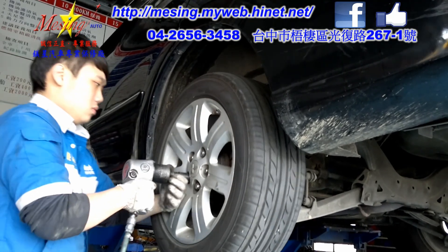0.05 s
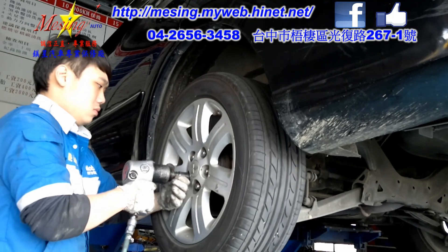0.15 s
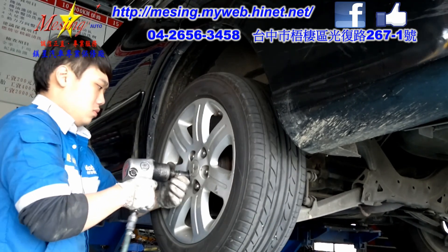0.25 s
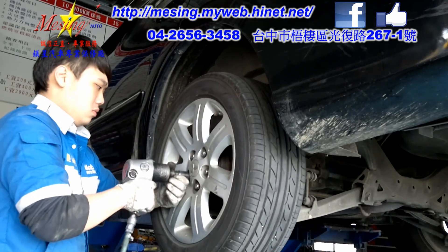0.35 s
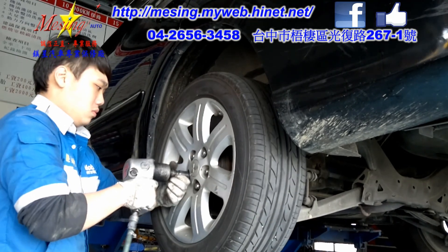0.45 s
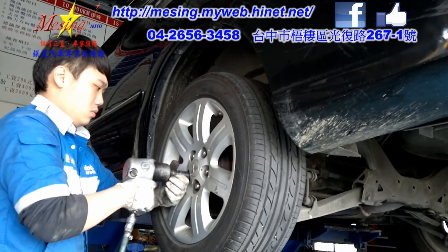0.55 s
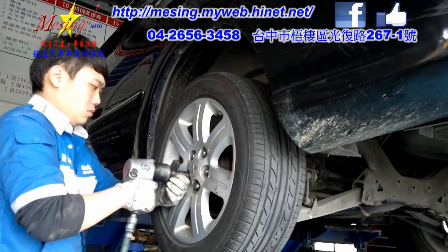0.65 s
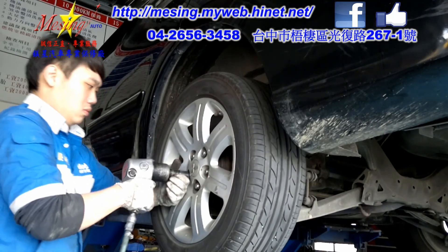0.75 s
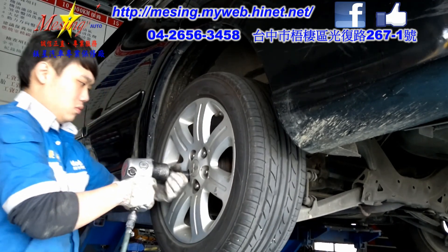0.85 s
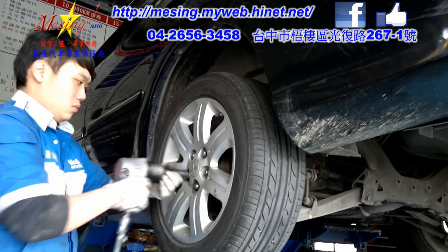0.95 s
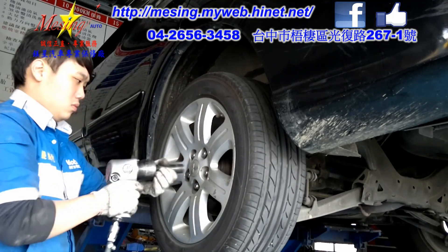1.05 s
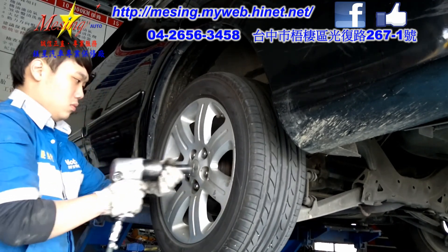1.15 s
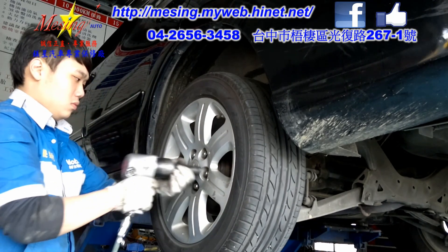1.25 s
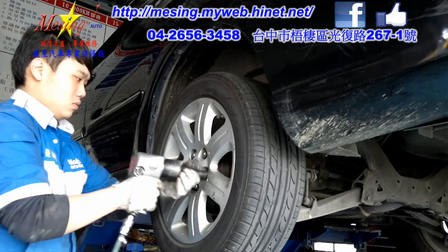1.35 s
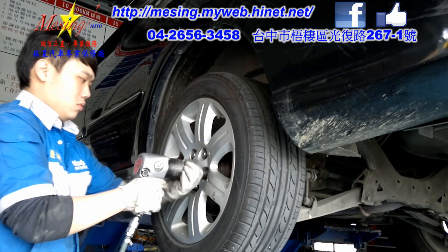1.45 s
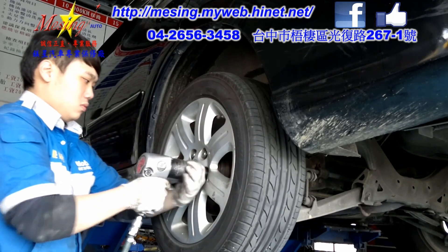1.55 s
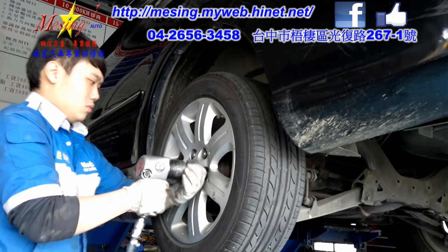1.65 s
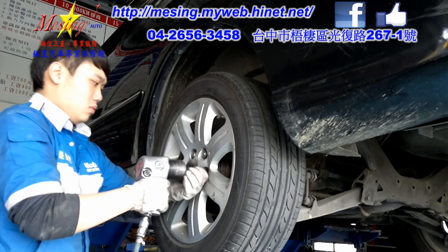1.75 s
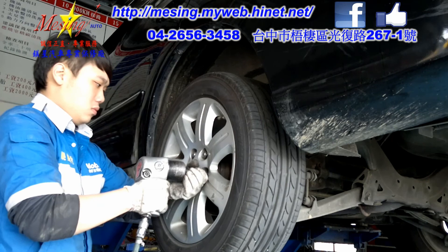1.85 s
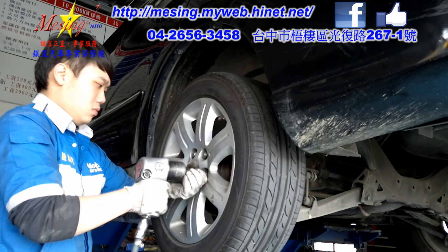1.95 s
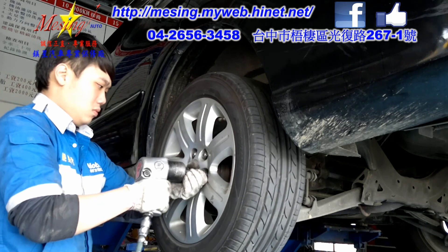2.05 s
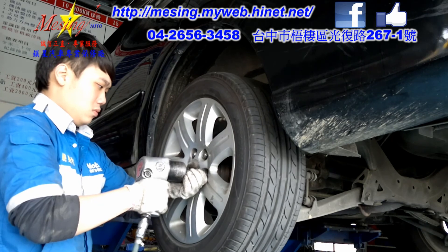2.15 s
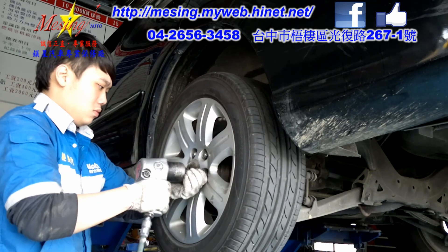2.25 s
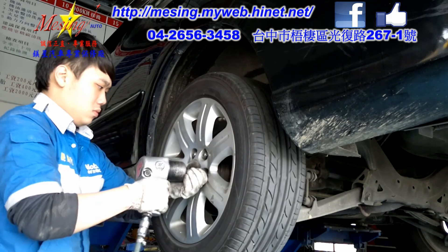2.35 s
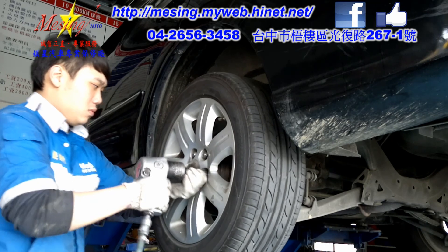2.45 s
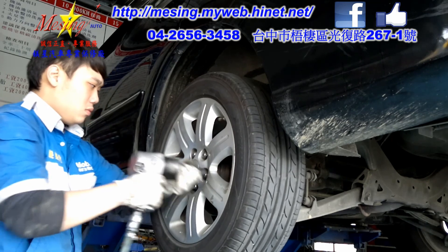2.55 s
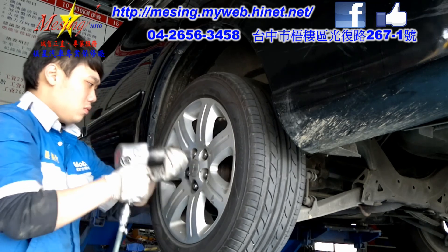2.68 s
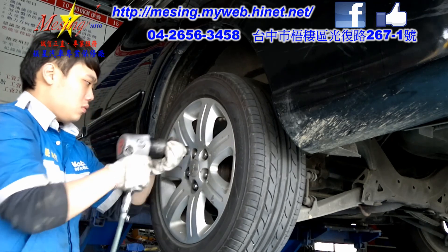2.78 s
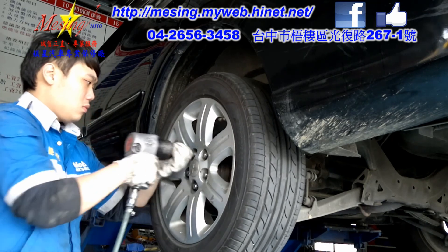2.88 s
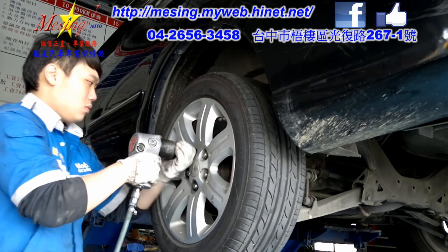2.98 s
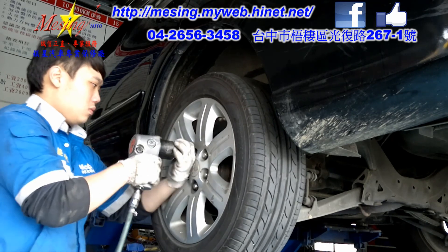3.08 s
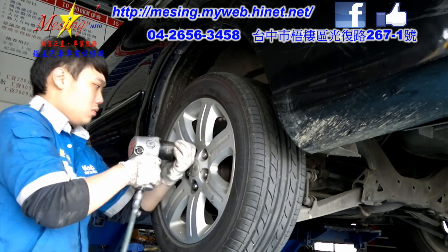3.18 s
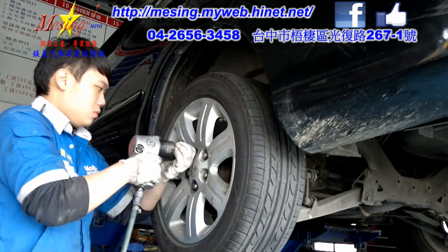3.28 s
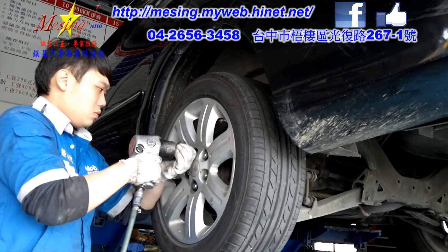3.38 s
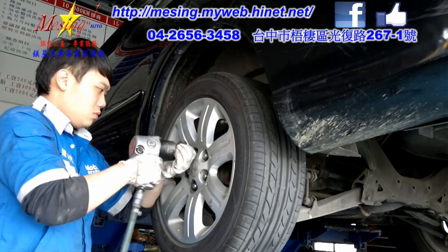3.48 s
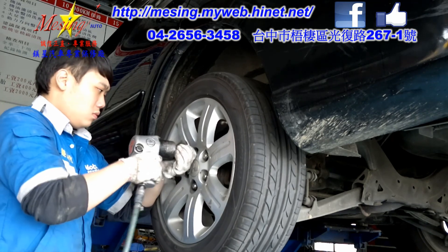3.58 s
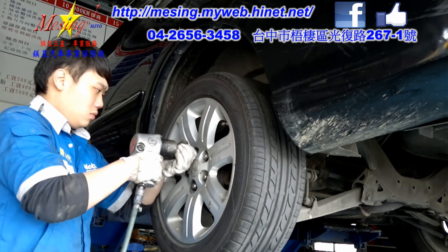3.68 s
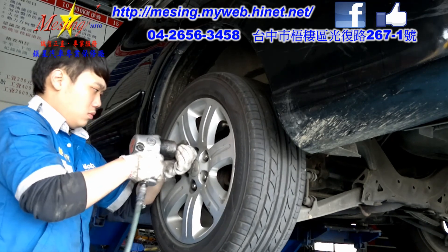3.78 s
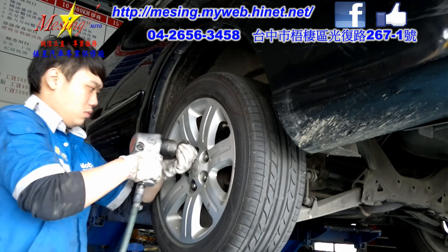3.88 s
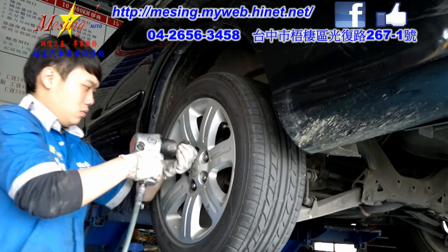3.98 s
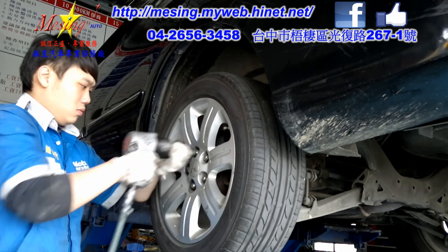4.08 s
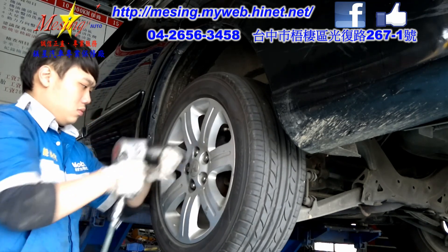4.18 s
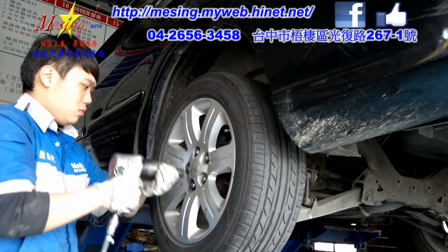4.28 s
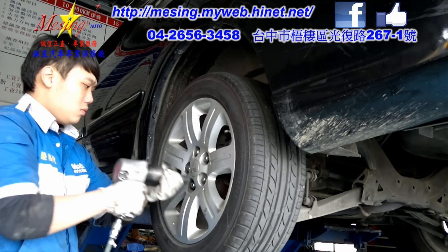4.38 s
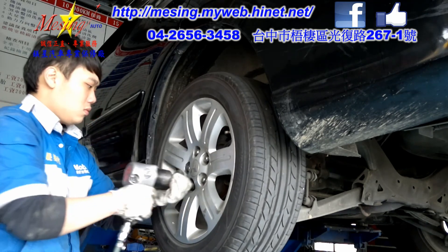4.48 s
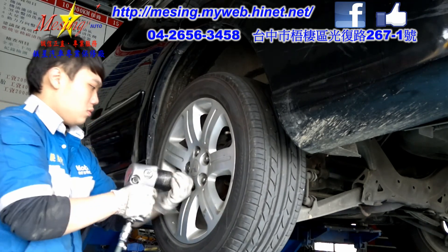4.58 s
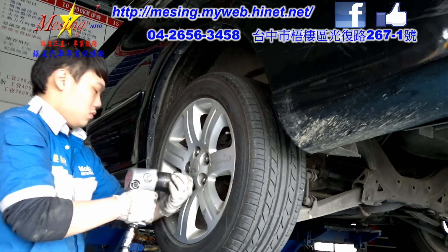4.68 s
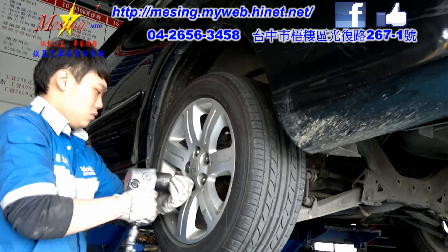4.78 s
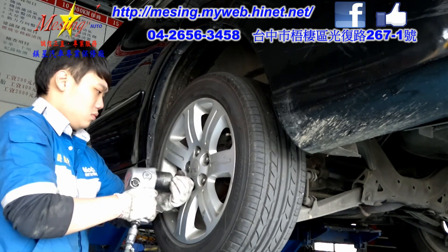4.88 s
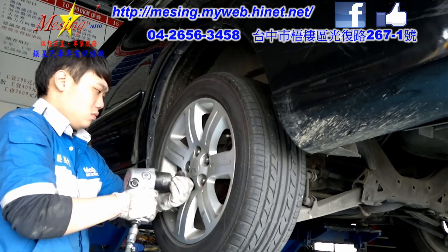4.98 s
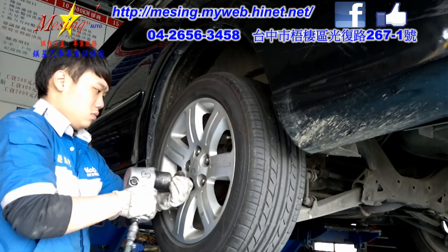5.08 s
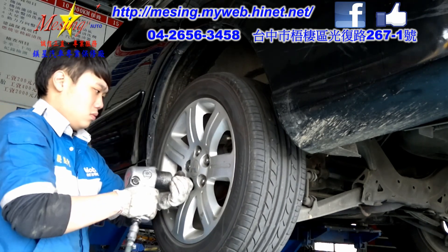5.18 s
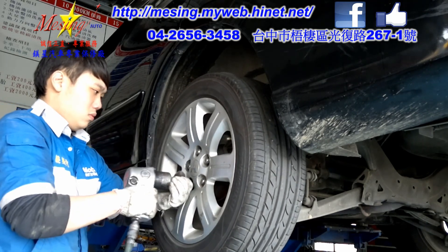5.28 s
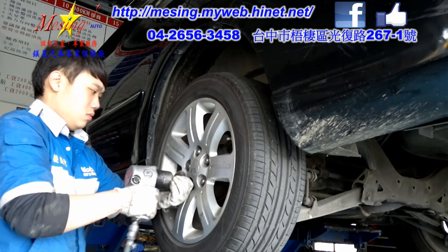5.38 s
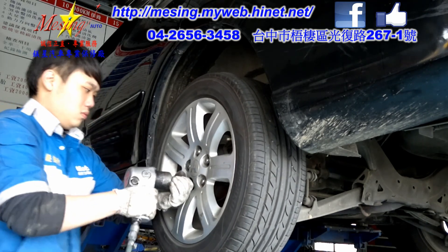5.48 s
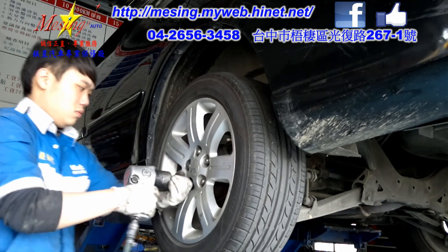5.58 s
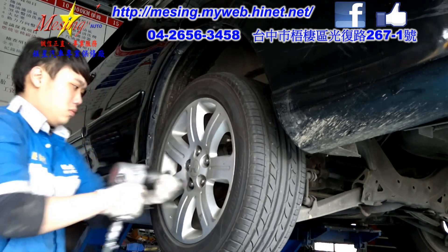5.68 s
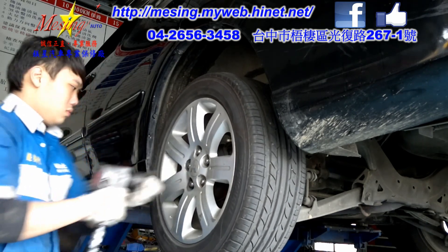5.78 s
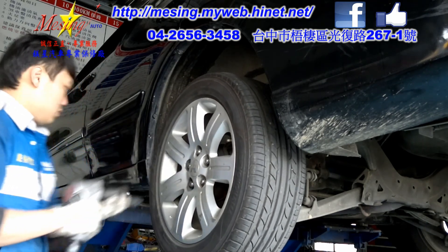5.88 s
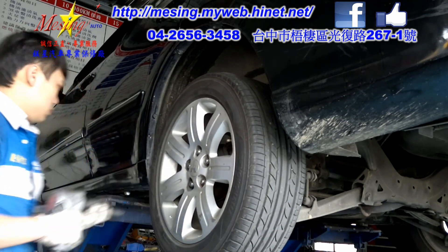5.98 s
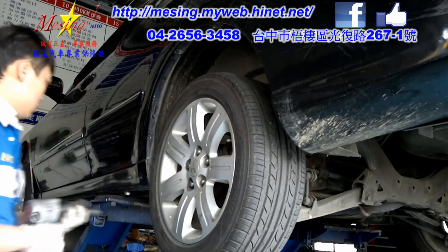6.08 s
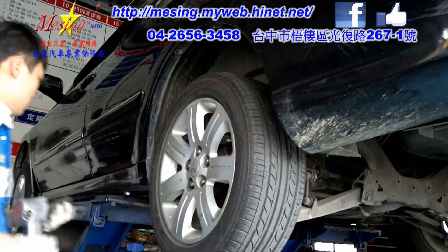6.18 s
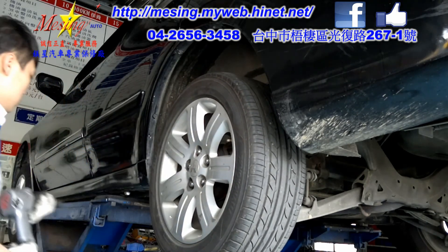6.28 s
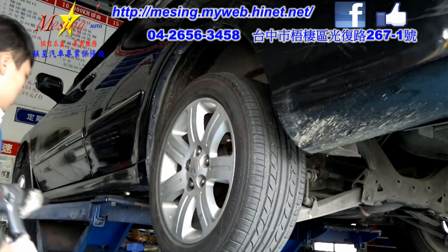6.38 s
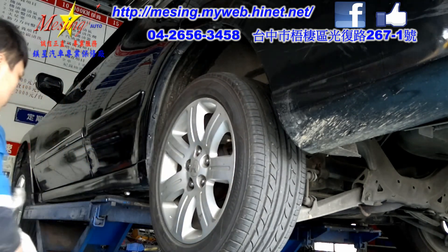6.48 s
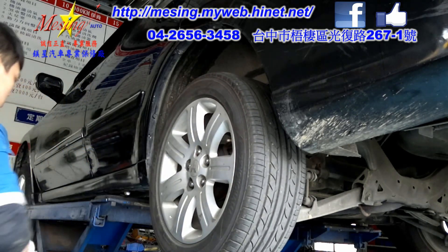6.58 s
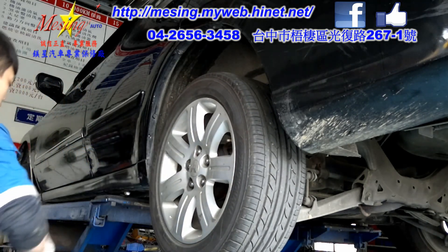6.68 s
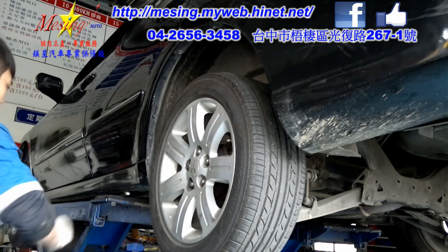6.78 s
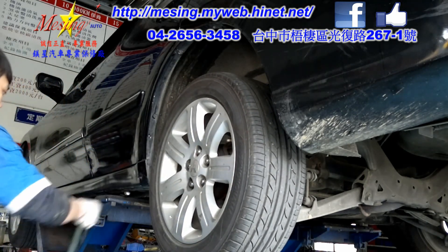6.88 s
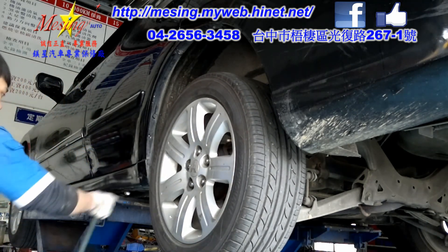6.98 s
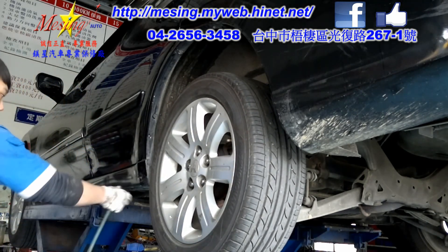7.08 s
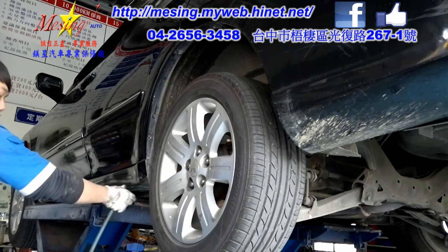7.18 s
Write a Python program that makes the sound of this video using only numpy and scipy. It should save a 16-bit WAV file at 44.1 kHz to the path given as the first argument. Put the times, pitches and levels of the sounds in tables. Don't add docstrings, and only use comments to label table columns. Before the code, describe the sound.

Four groups of four rattling pneumatic bursts, hissing and hammering at about twenty turns a second, with steel pings and low tyre thumps. Metallic clicks as the socket finds the next nut. Stereo microphone nearby in a hard workshop, with draught rumbling on it. The end is quieter: faint leaking air, a rolling lift, one sharp tool knock and a scraping hose.

```python
import sys
import numpy as np
from scipy import signal
from scipy.fft import rfft, irfft, next_fast_len
from scipy.io import wavfile
from scipy.ndimage import uniform_filter1d, map_coordinates

SR = 44100
rng = np.random.default_rng(int(sys.argv[2]) if len(sys.argv) > 2 else 0)


def magnitude_from_level(level_db):
    exponent = np.asarray(level_db, float) / 20
    return 10 ** exponent


def inscribe(sig):
    pcm = np.round(np.clip(np.atleast_2d(sig).T, -1, 1) * 32767)
    wavfile.write(sys.argv[1], SR, pcm.astype(np.int16))


N = 319284

# (time [s], held [s], air level [dB], hammer turn [s], roar over jet [dB])
TRIGGER_PULLS = [(0.008, .315, -22.5, .0418, 2.5), (0.417, 0.096, -22.5, .045, 0.5),
                 (0.607, 0.12, -25, 0.044, 3.5), (0.772, 0.125, -24, .048, 5), (1.733, 0.23, -22, 0.047, 6),
                 (2.045, 0.11, -23, 0.054, 4.5), (2.229, 0.1, -24.5, 0.053, 3.5),
                 (2.392, 0.14, -23, 0.057, 3), (3.234, 0.25, -22, 0.041, 5), (3.592, 0.12, -23, 0.051, 4.5),
                 (3.772, 0.087, -24, .0415, 5), (3.948, 0.11, -22.5, 0.037, -0.5),
                 (4.806, 0.26, -22, .043, 2), (5.14, 0.096, -23, .043, 7), (5.305, 0.12, -25, 0.038, 4),
                 (5.503, 0.094, -23, 0.047, 3)]
# (frequency [Hz], level [dB per Hz])
SOCKET_RATTLE = [(590, -31), (1000, -4), (1240, -9.5), (1340, -4.5), (1570, -5.5), (1680, -6), (1800, -3.5),
                 (2470, -4), (2910, -1), (3210, -5), (3580, -3.5), (4890, -8.5), (5200, -13.5), (6760, -25),
                 (11400, -120)]


def unit(x):
    return x / np.sqrt(np.mean(x ** 2) + 1e-20)


def along(points, hz):
    f, v = np.transpose(points)
    return np.interp(np.log(hz + 1), np.log(f + 1), v)


def curves(rows, **ends):
    s, *columns = np.transpose(rows)
    t = np.arange(N) / SR
    return np.array([np.interp(t, s, column, **ends) for column in columns])


def wobble(rate):
    knots = rng.standard_normal(int(N * rate / SR) + 4)
    return map_coordinates(knots, [np.arange(N) * rate / SR])


def filtered(x, response):
    m = next_fast_len(N + SR // 2)
    return irfft(rfft(x, m) * response(np.fft.rfftfreq(m, 1 / SR)), m)[..., :N]


def noise(spectrum):
    return unit(filtered(rng.standard_normal(N), lambda hz: magnitude_from_level(along(spectrum, hz))))


def shaped(events, shape):
    spikes = np.bincount(np.round(events[:, 0] * SR).astype(int), magnitude_from_level(events[:, 1]), N)
    return signal.fftconvolve(spikes, shape)[:N]


def spread(pair):
    # (frequency [Hz], left-right likeness [-1 to 1])
    port_likeness = [(60, 0.95), (170, 0.87), (480, 1), (1360, 0.098), (3850, -0.051), (10900, -0.2)]

    def turn(hz):
        return np.arccos(np.clip(along(port_likeness, hz), -1, 1)) / 2

    mid, side = filtered(pair, lambda hz: np.array([np.cos(turn(hz)), np.sin(turn(hz))]))
    return np.array([mid + side, mid - side])


def draught():
    # (time [s], level [dB])
    steady_buffet = [
        (0, -26),
        (.45, -24),
        (1, -37),
        (2.5, -39.5),
        (4.3, -42.5),
        (5.1, -39.5),
        (5.85, -49),
        (6.4, -35.5),
        (7.24, -33),
    ]
    # (time [s], peak level [dB])
    air_gusts = [(.12, -21), (.22, -25), (.54, -24), (.83, -42), (1.11, -39), (1.195, -30), (1.41, -31),
                 (1.571, -30), (1.725, -19), (1.86, -39), (2.399, -48), (2.68, -48), (2.94, -38.5),
                 (3.1, -28), (3.178, -27), (4.01, -43), (4.655, -27), (4.759, -35), (6.469, -35.5),
                 (6.56, -33), (6.72, -38.5), (7.02, -28), (7.2, -24)]
    # (frequency [Hz], level [dB per Hz])
    buffet_spectrum = [(8.8, -33), (15, -2.5), (49, 3), (139, -3), (221, -11.5), (271, -13.5), (320, -16.5),
                       (420, -25), (700, -120)]
    rise_s, fall_s, right_db = 0.024, 0.031, 5
    lumps = magnitude_from_level(1.5 * np.array([wobble(20), wobble(24)]))
    s, db = np.transpose(air_gusts)[..., None]
    u = np.arange(N) / SR - s
    gusts = np.sum(magnitude_from_level(db) * np.exp(-(u / np.where(u < 0, rise_s, fall_s)) ** 2), axis=0)
    pressure = unit(lumps * [noise(buffet_spectrum), noise(buffet_spectrum)])
    return (magnitude_from_level(curves(steady_buffet)) + gusts) * magnitude_from_level([[-right_db], [right_db]]) * pressure


def shop():
    # (time [s], lift roll level [dB], hose drag level [dB])
    lift_and_hose = [
        (6.32, -52, -57),
        (6.375, -29.5, -48),
        (6.46, -37.5, -44.5),
        (6.61, -34.5, -40),
        (6.682, -27.5, -24.5),
        (6.694, -22.5, -23),
        (6.85, -27.5, -28.5),
        (7.02, -29.5, -35),
        (7.14, -26, -30.5),
    ]
    # (time [s], leak level [dB])
    gain_recovery = [
        (0, -61),
        (1.3, -49.5),
        (2.9, -48),
        (4.4, -46),
        (5.8, -51),
        (6, -44),
        (7.24, -35),
    ]
    # (frequency [Hz], level [dB per Hz])
    lift_roll = [(88, -47), (150, -7), (334, -8.5), (416, -6.5), (752, -3.5), (960, -10), (1560, -10),
                 (2400, -39), (3120, -68), (5280, -120)]
    hose_drag = [(880, -30), (1500, -5.5), (2160, 0.5), (2590, -7.5), (3860, -5), (5010, -11),
                 (5940, -11.5), (10500, -35.5), (13600, -59), (22000, -120)]
    air_leak = [(150, -45), (250, -16), (270, -2.5), (301, -21), (331, -7.5), (554, -7), (818, -7.5),
                (884, -13), (2290, -18), (3660, -11.5), (4920, -21), (5930, -25), (10400, -44),
                (13500, -63), (22000, -120)]

    def pair(spectrum):
        return np.array([noise(spectrum), noise(spectrum)])

    roll, drag = magnitude_from_level(curves(lift_and_hose, left=-120) + 1.1 * wobble(25))
    leak = magnitude_from_level(curves(gain_recovery))
    return spread(roll * pair(lift_roll) + drag * pair(hose_drag) + leak * pair(air_leak))


def hall(x):
    # (frequency [Hz], t60 [s])
    hall_decay = [(200, 0.43), (700, 0.65), (3000, 0.7), (6000, 0.61), (10000, 0.33)]
    wet = 0
    phase = np.arange(N) / SR / 0.3493
    for k in range(2):
        hz, t, z = signal.stft(rng.standard_normal((2, 3 * SR // 4)), SR, nperseg=256)
        decay = magnitude_from_level(-60 * t / along(hall_decay, hz)[:, None])
        tail = signal.istft(z * decay, SR, nperseg=256)[1]
        part = x * np.cos(np.pi * (phase - k) / 2) ** 2
        delayed = np.pad(part, (300, 0))[None]
        wet = wet + signal.fftconvolve(delayed, tail / np.linalg.norm(tail[0]), axes=1)[:, :N]
    return spread(wet)


def nearby(x):
    shift_s, shaded_hz = 0.09, 4300
    t, count = np.arange(SR // 12) / SR, 6
    paths = rng.standard_normal((count, 2, len(t))) * magnitude_from_level(-60 * t / 0.025)
    scatter = np.diff(paths, prepend=0)
    away = (np.arange(N) / SR / shift_s - np.arange(count)[:, None]) % count - 1
    parts = x * np.cos(np.pi / 2 * np.clip(away, -1, 1))
    scattered = signal.fftconvolve(parts[:, None], scatter / np.linalg.norm(scatter[0, 0]), axes=2)
    direct = filtered(x, lambda hz: 1 / (1 + 1j * hz / shaded_hz))
    return direct + magnitude_from_level(4.5) * scattered.sum(0)[:, :N]


def body(f):
    # (frequency [Hz], width [Hz], level [dB])
    body_modes = [(266.5, 80, -1), (374, 76, -1.5), (463, 133, -3), (655.5, 80, 1.5), (836, 80, -4),
                  (946, 145, -6), (1243, 125, -7)]
    return sum((-1) ** k * magnitude_from_level(db) * 1j * f * width / (centre * centre - f * f + 1j * f * width)
               for k, (centre, width, db) in enumerate(body_modes))


def strikes(events, modes, knock_db):
    # (frequency [Hz], level [dB per Hz])
    contact_noise = [(240, -51), (400, -8), (677, -1), (930, -10), (3510, -8), (8150, -35), (10300, -57),
                     (10900, -45), (14200, -71), (22000, -120)]
    out, scrape, push = np.zeros(N + SR), np.zeros(N + SR), np.zeros(N)
    t = np.arange(SR // 5) / SR
    contact = 1 - np.exp(-t / 0.00044)
    for s, db, ring_db, thud_db, scrape_s in events:
        start = round(s * SR)
        luck = rng.standard_normal((len(modes), 2))
        ring = sum(magnitude_from_level(level + 1.9 * a - 60 * t / t60) * np.sin(2 * np.pi * hz * (1 + 0.027 * b) * t)
                   for (hz, level, t60), (a, b) in zip(modes, luck))
        out[start:][:len(t)] += magnitude_from_level(db + ring_db) * ring * contact
        scrape[start:][:len(t)] += magnitude_from_level(db - 60 * t / max(scrape_s, 0.003))
        push[start] = magnitude_from_level(db + thud_db + knock_db)
    return out[:N] + magnitude_from_level(-7.0) * scrape[:N] * noise(contact_noise) + filtered(push, body)


def clicks():
    # (time [s], peak level [dB], ring level [dB], knock level [dB], scrape t60 [s])
    metal_touches = [(1.3907, -17, -11.5, -8.5, 0.16), (1.4616, -27, -18, -10, 0.1),
                     (1.5923, -29, 2, -12, 0.05), (1.6076, -16, -5.5, 6.5, 0.19),
                     (2.6794, -28, -13, -5, 0.1), (2.9804, -24, 1.5, -20, 0.24),
                     (3.1313, -25, -13, -15, 0.26), (4.5441, -23.5, -7, -9, 0.13),
                     (4.563, -21.5, -6, -8.5, 0.19), (4.6648, -29.5, -14, -6, 0.12),
                     (6.6885, -7, -10.5, -19, 0.04)]
    # (frequency [Hz], level [dB], t60 [s])
    socket_modes = [(1220, -3, 0.03), (2300, -6, 0.043), (2944, 3, 0.03), (3700, -3, 0.025),
                    (4440, -4, 0.03), (6170, -13, 0.036)]
    return strikes(metal_touches, socket_modes, knock_db=32.5)


def airflow():
    opening, sagging, closing = (899, 1300), (11, 13.5), (188, 257.5)  # (jet, roar) [dB per s]
    rates = np.array([opening, sagging, closing])
    t = np.arange(N) / SR
    gains = 0
    for s, held, db, _, roar_db in TRIGGER_PULLS:
        u = t - s
        ramps = np.array([np.maximum(-u, 0), np.clip(u, 0, held), np.maximum(u - held, 0)])
        gains = gains + magnitude_from_level(db + np.array([[0], [roar_db]]) - rates.T @ ramps)
    return gains


def turns():
    loss_db, jitter_s = 0.6, 0.0012
    s, held, db, turn, _ = np.transpose(TRIGGER_PULLS)[..., None]
    k = np.arange(10) + 0 * s
    luck = rng.standard_normal(k.shape + (4,))
    on = k * turn < held
    moments = s + k * turn + jitter_s * luck[..., 0] * (k > 0)
    return moments[on], (db - loss_db * k)[on], (k == 0)[on], luck[on][:, 1:].T


def chatter():
    ticks_per_s, scatter_db = 170, 3
    slots = np.arange(int(N / SR * ticks_per_s))
    luck = rng.random((len(slots), 2))
    ticks = np.zeros(N)
    moments = ((slots + luck[:, 0]) / ticks_per_s * SR).astype(int)
    ticks[moments] = magnitude_from_level(-scatter_db * np.log(luck[:, 1]))
    return magnitude_from_level(-9) * airflow()[0] * unit(filtered(ticks, lambda hz: magnitude_from_level(along(SOCKET_RATTLE, hz))))


def thump(turning):
    thump_hz, lag_s, width_s = 275, 0.01699, 0.0048
    s, db, _, luck = turning
    t = np.arange(SR // 20) / SR - lag_s
    cycles = np.cos(2 * np.pi * thump_hz * t) * np.exp(-0.5 * (t / width_s) ** 2)
    return shaped(np.transpose([s, db + 3.5 + 1.5 * luck[2]]), cycles)


def hammer(turning):
    # (time [s], peak level [dB], clank level [dB])
    square_blows = [(0.188, -11, -22), (0.3147, -6, -13), (0.4334, -4, -15), (0.6629, -1, -4),
                    (0.7886, -5, -17), (0.889, -7, -9), (1.7343, -5, -2), (1.8919, -1.5, -9),
                    (2.0137, -6.5, -16), (2.0441, -7, -1.5), (2.0685, -3, -10), (2.1528, -3.5, -21),
                    (2.2935, -5, -12), (2.3943, -10, 0), (2.4686, 2.5, -10), (2.5375, -5.5, -11),
                    (3.2338, -4, 0), (3.3316, -10, -14), (3.3969, -3, -18), (3.4982, -5, -19),
                    (3.574, -1, -16), (3.7132, -6, -14), (3.8699, -4.5, -18), (3.9577, -10, -18),
                    (4.0814, -1, -23), (4.1033, -4, -16), (4.9923, -3, -16), (5.3595, -0.5, -11),
                    (5.3999, -2, -19), (5.6114, -2, -14)]
    # (frequency [Hz], level [dB], t60 [s])
    anvil_modes = [(2850, 0, .014), (3660, -5, .012), (1900, -7, .01), (5600, -10, .01), (4400, -10, .01)]
    lag_s, blow_db, blow_scatter_db = 0.0155, 13.5, 1.8
    clank_db, clank_scatter_db = -11, 2.5
    twin_lag_s, twin_db = 0.021, -2
    s, db, _, luck = turning
    blow = db + blow_db + blow_scatter_db * luck[1]
    first = np.transpose([s + lag_s, blow, clank_db + clank_scatter_db * luck[2]])
    change = twin_db + blow_scatter_db * (luck[0] - luck[1])
    twin = first + np.transpose([twin_lag_s + 0 * s, change, 0 * s])
    events = [(s, db + 0.5, -1.5, clank, 0.012) for s, db, clank in [*square_blows, *first, *twin]]
    return strikes(events, anvil_modes, knock_db=20)


def exhaust(turning):
    # (frequency [Hz], level [dB per Hz])
    air_hiss = [(2650, -9.5), (4500, 4), (5030, -5.5), (5650, 0.5), (6500, -3.5), (9800, -17), (10400, -21),
                (13500, -80), (22000, -120)]
    puff_db, first_db, scatter_db = 17, 1.3, 1.2
    jet, roar = airflow()
    s, db, first, luck = turning
    t = np.arange(SR // 10) / SR
    puff = (1 - np.exp(-t / 0.0038)) * np.exp(-(t / 0.022) ** 3)
    puff_levels = db + puff_db + first_db * first + scatter_db * luck[0]
    puffs = shaped(np.transpose([s, puff_levels]), puff)
    low = unit(filtered(rng.standard_normal(N) * magnitude_from_level(1.8 * wobble(150)), body))
    grains = rng.standard_normal(N) * magnitude_from_level(3.9 * wobble(300))
    rattle = unit(filtered(grains, lambda hz: magnitude_from_level(along(SOCKET_RATTLE, hz))))
    hiss = noise(air_hiss) * magnitude_from_level(2.2 * wobble(60))
    return (low * (magnitude_from_level(-3.5) * roar + magnitude_from_level(-12.5) * puffs)
            + rattle * (magnitude_from_level(2.5) * jet + magnitude_from_level(-15) * puffs)
            + hiss * (magnitude_from_level(-2) * jet + magnitude_from_level(-37.5) * puffs))


def scene():
    # (frequency [Hz], phase by which left leads [rad])
    left_lead = [(0, -2.5), (1400, 0.92), (3000, 0), (4000, -1), (5900, -7.5), (8400, -17.5), (11000, -22)]
    # (frequency [Hz], left minus right [dB])
    port_difference = [(60, -6), (190, -6.5), (610, -0.5), (1900, 1), (3400, -4.5), (6000, -9), (7500, -12),
                       (9000, -24), (10900, -27.5)]
    turning = turns()
    beats = thump(turning) + hammer(turning)
    tool = exhaust(turning) + chatter() + beats + clicks()
    close = nearby(tool - 0.65 * beats) + 0.8 * beats
    direct = filtered(close, lambda hz: np.exp(0.5j * along(left_lead, hz) * [[1], [-1]]))
    air = magnitude_from_level(-1.5) * direct + magnitude_from_level(-5.0) * hall(tool - 0.45 * beats) + shop()
    ports = filtered(air, lambda hz: magnitude_from_level(along(port_difference, hz) * [[0.5], [-0.5]]))
    return ports + draught()


def band_limit(x):
    return signal.sosfilt(signal.butter(12, 11490, fs=SR, output="sos"), x)


def record(dry):
    # (frequency [Hz], level [dB per bin])
    audible_floor = [(5500, -125), (7000, -99), (8000, -83.5), (10500, -89.5)]
    ceiling, top_hz = 0.88, 10620
    limited = dry / (1 + np.abs(dry / ceiling) ** 6) ** (1 / 6)
    held = filtered(limited, lambda hz: 1 / (1 + (hz / top_hz) ** 200))
    hz, _, z = signal.stft(held, nperseg=2048, fs=SR)
    power = uniform_filter1d(np.abs(z) ** 2, size=12, axis=1)[:, 6::12]
    bands = np.repeat(power, repeats=12, axis=1)[:, :len(hz)]
    count = bands.shape[1]
    z[:, :count] *= bands > magnitude_from_level(2 * along(audible_floor, hz[:count, None]))
    mix = signal.istft(z, nperseg=2048)[1][:, :N]
    return band_limit(mix)


dry = scene()
out = record(dry)
inscribe(out)
```